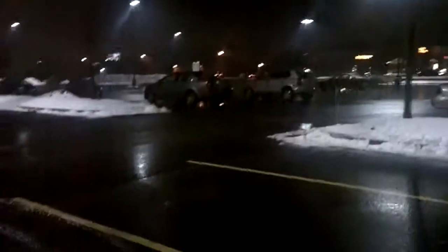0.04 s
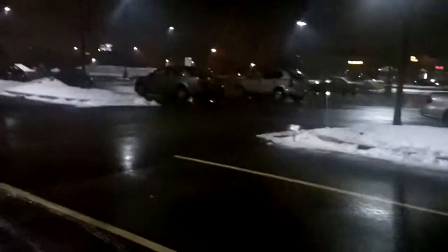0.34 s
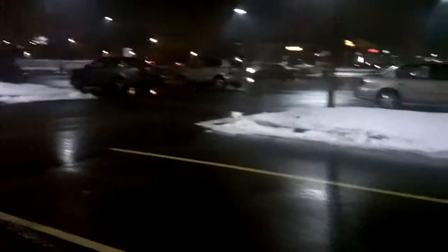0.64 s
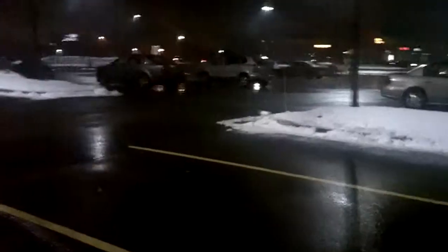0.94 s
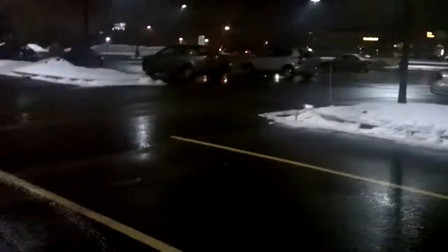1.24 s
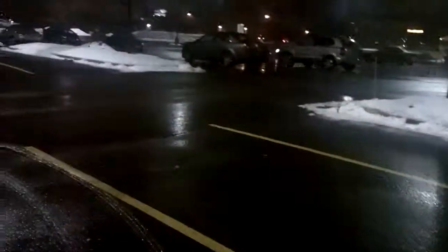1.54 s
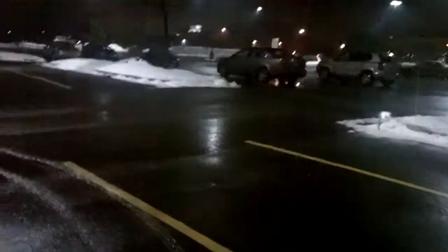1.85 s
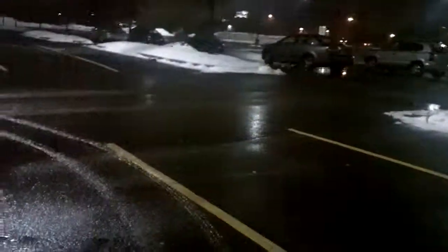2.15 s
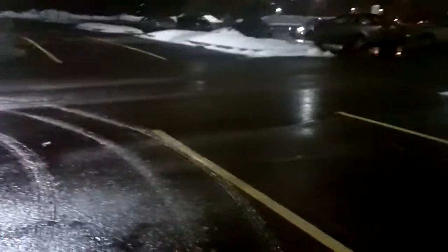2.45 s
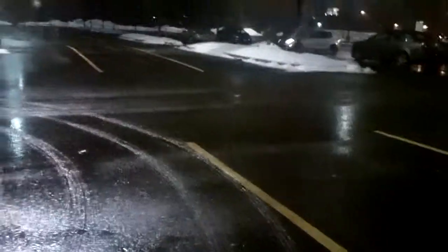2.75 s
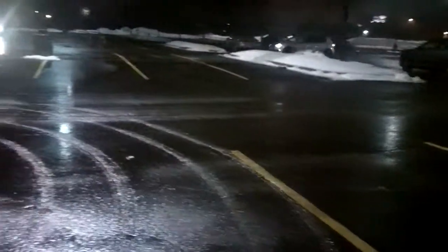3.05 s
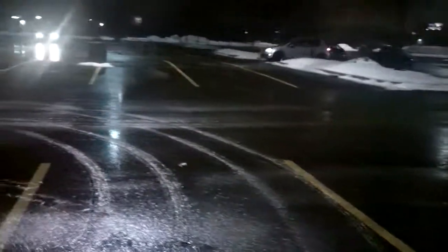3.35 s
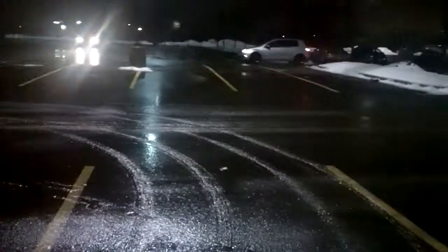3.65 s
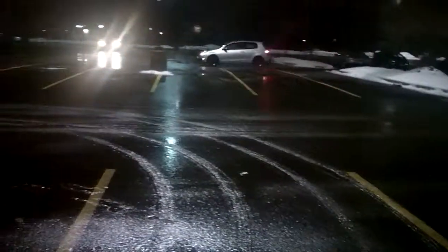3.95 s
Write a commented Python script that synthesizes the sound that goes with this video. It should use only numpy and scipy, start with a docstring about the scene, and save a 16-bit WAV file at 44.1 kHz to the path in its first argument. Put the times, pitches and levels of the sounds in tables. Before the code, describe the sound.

A car engine with a loud exhaust hums low, swells from about 0.6 seconds and barks hardest between 1.4 and 1.9. It lifts off with a breathy rasp near 2 seconds, then drones away, sinking in pitch. Tyres hiss on wet ground throughout, over a quieter slowing engine and distant traffic. A small tick sounds at the start, wind bumps the microphone intermittently, and another car approaches from 3.5 seconds.

```python
"""A wet car park at night. A car revs, barks at full throttle, lifts off and drones away: its periodic firings
radiate a harmonic series, coloured by the tailpipe. A quieter engine sinks in pitch as it slows. Tyres roar and
hiss on the water film, and another car draws near at the end, over distant traffic. Air buffets the microphone,
and narrow notches cut into the treble; two small ticks sound close by."""
import sys
import numpy as np
from scipy import signal
from scipy.fft import rfft, irfft
from scipy.io import wavfile

SR = 44100
rng = np.random.default_rng(int(sys.argv[2]) if len(sys.argv) > 2 else 0)


def generate_wav(signal):
    """Clip the signal to [-1, 1] and save it as 16-bit WAV at the path in sys.argv[1]."""
    frames = np.transpose(np.atleast_2d(signal))
    scaled = np.clip(frames, -1, 1) * 32767
    pcm = np.round(scaled).astype(np.int16)
    wavfile.write(sys.argv[1], SR, pcm)


N = 176400

# loud engine: (time [s], firing rate [Hz])
FIRING_RATE = [(0.0, 111.9), (0.38, 112.3), (0.5, 109.3), (0.73, 114.1), (0.87, 114.2), (1.1, 118.6),
               (1.42, 126.6), (1.5, 126.0), (1.61, 135.2), (1.65, 135.2), (1.72, 138.9), (1.88, 131.6),
               (2.12, 134.5), (2.35, 132.9), (2.55, 131.9), (3.05, 127.5), (3.5, 124.1), (4.0, 117.6)]
# exhaust note: (time [s], fundamental [dB], second harmonic [dB], bark of the upper harmonics [dB])
EXHAUST_LEVELS = [(0, -43, -53, -57), (0.25, -44, -54.5, -69), (0.4, -44.5, -47.5, -58.5),
                  (0.6, -36.5, -43, -63.5), (0.72, -29, -36.5, -46.5), (0.95, -24, -37, -49.5),
                  (1.1, -24, -37, -45), (1.25, -22.5, -39.5, -42.5), (1.42, -24, -35, -35.5),
                  (1.49, -19.5, -28.5, -34), (1.6, -23, -30, -31.5), (1.7, -17.5, -32, -31.5),
                  (1.8, -21, -35.5, -31.5), (1.87, -21.5, -31, -35), (1.97, -22.5, -31.5, -47),
                  (2.15, -30.5, -38.5, -51.5), (2.27, -30, -53, -52), (2.45, -32, -44, -55),
                  (2.65, -29, -38.5, -62), (2.95, -36, -57.5, -57.5), (3.3, -34.5, -46.5, -63.5),
                  (3.58, -34.5, -43, -77), (3.76, -40.5, -50, -49), (3.92, -33.5, -53, -50.5),
                  (4, -36, -47, -52)]
# tailpipe response that colours the bark: (frequency [Hz], gain [dB])
TAILPIPE_RESPONSE = [(300, 3), (342, 4.5), (365, -9), (410, -2), (455, -4.5), (510, 0), (570, -3.5),
                     (590, -10.5), (630, -3), (660, -9.5), (690, -5), (750, -16.5), (850, -18), (1000, -33),
                     (1400, -33)]
# rush of exhaust gas: (frequency [Hz], relative density [dB])
GAS_SPECTRUM = [(40, -2), (80, 2.5), (190, 6), (300, -13), (450, -3.5), (650, -6.5), (850, -21),
                (1200, -16.5), (3000, -34.5)]
# breathy rasp of the pipe as the throttle opens and after it shuts: (time [s], level [dB])
RASP_LEVEL = [(.6, -74), (.72, -47), (.8, -52), (.92, -66), (1.85, -60.5), (2.05, -47), (2.25, -54),
              (2.42, -68), (4, -77)]
# that rasp: (frequency [Hz], relative density [dB])
RASP_SPECTRUM = [(470, -13.5), (575, 3), (690, -4), (780, -17)]
# second engine: (time [s], firing rate [Hz], fundamental [dB], second harmonic [dB])
QUIET_ENGINE = [(0, 87.26, -37.5, -42.5), (.5, 86.4, -41, -51.5), (1, 84.06, -42, -46.5),
                (1.5, 80.56, -35, -51), (2, 78.26, -38.5, -50), (2.5, 76.22, -39, -48.5),
                (3, 71.8, -43, -50), (3.25, 67.46, -42, -56), (3.5, 59.82, -41, -73),
                (3.8, 57.58, -36, -54), (4, 59, -61, -60)]
# tyres on water, before each band's trim: (time [s], roar [dB], hiss [dB], spray [dB])
TYRE_LEVELS = [(0.13, -51.5, -50, -70), (0.36, -59, -52, -74), (0.53, -53, -51, -75),
               (0.74, -51.5, -51.5, -74), (0.92, -49.5, -42.5, -82), (0.99, -47.5, -44.5, -68),
               (1.08, -47.5, -43, -75), (1.14, -47.5, -44.5, -67), (1.22, -46.5, -42.5, -65),
               (1.44, -46, -45.5, -71), (1.78, -44.5, -41, -63), (1.84, -40.5, -41, -67),
               (2.36, -44.5, -43.5, -65.5), (2.66, -43.5, -39, -60.5), (2.8, -45.5, -43.5, -63.5),
               (3.41, -49.5, -48.5, -69), (3.46, -46, -48.5, -62), (3.56, -43.5, -42.5, -63.5),
               (3.63, -41, -39, -55), (3.7, -40, -38.5, -62), (3.77, -41, -36, -54.5),
               (3.84, -40.5, -40, -63.5), (3.97, -42.5, -39, -54.5), (4.0, -43, -36.5, -61)]
# tread roar, water hiss and fine spray: (frequency [Hz], relative density [dB])
ROAR_SPECTRUM = [(500, -11), (800, -2.5), (1050, -6), (1400, 3), (1800, 0.5), (2300, 3), (2700, -9),
                 (3400, -3.5), (5000, -30)]
HISS_SPECTRUM = [(2000, -24.5), (2700, -4), (3300, -1), (4500, 1.5), (4950, 1), (5100, -6), (6200, -12),
                 (7000, -16), (8000, -25), (10000, -33)]
SPRAY_SPECTRUM = [(6000, -14), (8000, -1.5), (9400, 1.5), (10500, -2.5), (11600, -5.5), (12500, -9.5),
                  (13700, -19), (15200, -25)]
# scuffs on wet ground: (time [s], half length [s], centre [Hz], half width [octaves], level [dB])
SWISHES = [(.19, .005, 10500, .25, -64), (0.536, .06, 4570, 0.17, -48.5), (.89, .035, 4000, 0.3, -46),
           (1.223, .025, 4270, 0.21, -45), (2.437, 0.0087, 557, 0.25, -43), (2.442, .008, 14000, .25, -70),
           (3.774, 0.018, 1530, 0.34, -40.5), (3.85, .015, 1100, .6, -41)]
# air on the microphone: (time [s], relative level [dB])
BUFFET_LEVEL = [(0.0, -42), (0.33, -33), (0.43, -54), (0.54, -29), (0.6, -42), (0.69, -43), (0.73, -52),
                (1.05, -52), (1.1, -53), (1.2, -59), (1.34, -35), (1.44, -53), (1.48, -22), (1.63, -52),
                (1.75, -25), (1.89, -49), (1.96, -34), (2.21, -48), (2.24, -25), (2.36, -58), (2.91, -38),
                (2.96, -57), (3.05, -33), (3.22, -62), (3.26, -37), (4.0, -46)]
# its rumble: (frequency [Hz], relative density [dB])
WIND_SPECTRUM = [(12, -14.5), (25, -1), (42, 2), (65, -11.5), (100, -13.5), (200, -28.5), (400, -48.5)]
# close contacts: (time [s], impulse level [dB])
TICKS = [(.0853, -38), (.1026, -21.5)]
# their resonances: (frequency [Hz], gain [dB], time to decay by 60 dB [s])
TICK_MODES = [(1900, -24, 0.0018), (4800, 2.5, 0.0039), (6100, 1, 0.0029), (10000, -22, 0.00092)]
# approaching car: (time [s], level [dB])
APPROACH_LEVEL = [(0, -73.5), (3.2, -51), (3.55, -49.5), (3.7, -44.5), (3.85, -40.5), (4, -40.5)]
# its road noise: (frequency [Hz], relative density [dB])
ROAD_SPECTRUM = [(150, -13), (300, 0), (420, -0.5), (580, 0.5), (800, -7), (1200, -16), (2000, -25)]
# distant traffic and background hiss: (frequency [Hz], relative density [dB])
TRAFFIC_SPECTRUM = [(20, -2.5), (50, 4.5), (100, 0.5), (190, -0.5), (280, -12), (400, -12), (600, -16.5),
                    (1000, -24.5), (2000, -23.5)]
BACKGROUND_SPECTRUM = [(600, -8), (1100, 2.5), (2000, -6.5), (4500, -3.5), (6300, -7.5), (8000, -22.5),
                       (11800, -24.5), (14000, -34), (15200, -31)]
# notches in the treble: (frequency [Hz], bandwidth [Hz])
TREBLE_NOTCHES = [(2713, 527), (5512, 910), (7860, 1650), (10917, 960)]


def loud_exhaust():
    """Periodic firings radiate harmonics; the tailpipe filters the upper ones, and gas leaves in pulses."""
    boom_roughness, bark_roughness, jitter_rad = 0.046, 0.15, 0.027   # unevenness of the firings
    third_db, wander_db, cylinder_db = -15, 1.5, -21
    gas_db, pulsing_depth = -2.5, 0.75
    firing_hz, = in_time(FIRING_RATE)
    boom, drone, bark = from_db(in_time(EXHAUST_LEVELS))
    phase = running_phase(firing_hz) + jitter_rad * drift(25)
    note = boom * (1 + boom_roughness * drift(17)) * np.sin(phase)
    note -= drone * (1 + boom_roughness * drift(25)) * np.cos(2 * phase)
    note -= drone * from_db(third_db) * np.cos(3 * phase)
    pulse = 0
    for k in range(3, 11):
        wander = from_db(wander_db * drift(4.8))
        pulse -= gain_at(TAILPIPE_RESPONSE, k * firing_hz) * np.cos(k * phase) * wander
    # unequal cylinders add lines between the harmonics
    orders = [k / 3 for k in range(2, 18) if k % 3]
    uneven = sum(np.cos(k * phase + rng.uniform(0, 2 * np.pi)) * (1 + .5 * drift(8.1)) for k in orders)
    note += bark * (pulse * (1 + bark_roughness * drift(46)) + from_db(cylinder_db) * uneven)
    rasp, = from_db(in_time(RASP_LEVEL))
    rush = from_db(gas_db) * bark * noise(GAS_SPECTRUM) + rasp * noise(RASP_SPECTRUM)
    return np.sqrt(2) * note + rush * (1 - pulsing_depth * np.cos(phase))


def quiet_engine():
    """Pitch follows firing rate, so this soft, uneven hum sinks as the car slows."""
    roughness, third_db, fall_db = 0.51, -13, 4.5   # third against second harmonic; loss per harmonic
    firing_hz, first_db, second_db = in_time(QUIET_ENGINE)
    phase = running_phase(firing_hz) + 0.15 * drift(4)
    hum = from_db(first_db) * np.sin(phase) + from_db(second_db) * np.sin(2 * phase)
    for k in range(3, 7):
        hum += from_db(second_db + third_db - fall_db * (k - 3)) * np.sin(k * phase + drift(9.6))
    return np.sqrt(2) * hum * (1 + roughness * drift(8.1))


def wet_tyres():
    """Rolling contact radiates broadband noise: the tread roars, the water film hisses and sprays."""
    roar_trim_db, hiss_trim_db, spray_trim_db = -0.53, 1.5, 1
    roar_db, hiss_db, spray_db = in_time(TYRE_LEVELS)
    flicker_db = 0.95 * drift(23)
    roar = from_db(roar_db + roar_trim_db + 0.67 * drift(45)) * noise(ROAR_SPECTRUM)
    hiss = from_db(hiss_db + hiss_trim_db + flicker_db) * noise(HISS_SPECTRUM)
    spray = from_db(spray_db + spray_trim_db + flicker_db) * noise(SPRAY_SPECTRUM)
    return roar + hiss + spray


def swishes():
    """Scuffs on wet ground are band-limited noise under a Gaussian envelope."""
    t, out = np.arange(N) / SR, 0
    octaves = np.log2(np.arange(1, N // 2 + 2) * SR / N)
    for peak_s, half_length_s, hz, half_width, db in SWISHES:
        passband = np.exp(-((octaves - np.log2(hz)) / half_width) ** 2)
        band = irfft(rfft(rng.standard_normal(N)) * passband, N)
        envelope = np.exp(-((t - peak_s) / half_length_s) ** 2 / 2)
        out += from_db(db) * envelope * unit_rms(band)
    return out


def wind(trim_db=-1):
    """Pressure fluctuations of air on the microphone make low lumps of noise."""
    level_db, = in_time(BUFFET_LEVEL)
    return from_db(level_db + trim_db) * noise(WIND_SPECTRUM)


def ticks(rebound_s=.0006, rebound_db=-7):
    """Each tiny hard impact and its one rebound excite damped modes."""
    impulses, out = np.zeros(N), 0
    for time_s, db in TICKS:
        impulses[int(time_s * SR)] += from_db(db)
        impulses[int((time_s + rebound_s) * SR)] += from_db(db + rebound_db)
    for hz, db, t60 in TICK_MODES:
        radius, angle = from_db(-60 / (t60 * SR)), 2 * np.pi * hz / SR
        feedback = [1, -2 * radius * np.cos(angle), radius ** 2]
        out += from_db(db) * signal.lfilter([0, np.sin(angle)], feedback, impulses + 1e-18)
    return out


def approaching_car():
    """Road noise grows in level as its source draws near."""
    level_db, = in_time(APPROACH_LEVEL)
    return from_db(level_db + 0.76 * drift(22)) * noise(ROAD_SPECTRUM)


def low_swell(peak_s=3.26, decay_s=0.16, hz=191, db=-38.5):
    """A low tone, randomly modulated in amplitude and frequency, rises and dies exponentially."""
    envelope = from_db(db) * np.exp(-np.abs(np.arange(N) / SR - peak_s) / decay_s)
    flutter = 1 + 0.36 * drift(20.07)
    return np.sqrt(2) * envelope * flutter * np.sin(running_phase(hz + 9 * drift(25)))


def background(traffic_db=-40.5, hiss_db=-53.5):
    """Stationary noise: the rumble of distant traffic and a faint hiss."""
    return from_db(traffic_db) * noise(TRAFFIC_SPECTRUM) + from_db(hiss_db) * noise(BACKGROUND_SPECTRUM)


def from_db(db):
    """Amplitude grows tenfold for every 20 dB."""
    return 10 ** (np.asarray(db) / 20)


def unit_rms(x):
    """Normalisation to unit mean power."""
    return x / np.sqrt(np.mean(x ** 2) + 1e-20)


def in_time(rows):
    """Linear interpolation of each column over time."""
    times, *columns = np.transpose(rows)
    return [np.interp(np.arange(N) / SR, times, column) for column in columns]


def gain_at(spectrum, hz):
    """Gain of a spectrum, interpolated in decibels over log frequency."""
    points_hz, db = np.transpose(spectrum)
    return from_db(np.interp(np.log(hz + 1e-9), np.log(points_hz), db))


def noise(spectrum):
    """Spectral shaping of white noise, at unit rms, with steep skirts beyond the table's ends."""
    hz = np.arange(N // 2 + 1) * SR / N + 1e-9
    skirts = np.minimum(1, hz / spectrum[0][0]) ** 2 * np.minimum(1, spectrum[-1][0] / hz) ** 4
    return unit_rms(irfft(rfft(rng.standard_normal(N)) * gain_at(spectrum, hz) * skirts, N))


def drift(corner_hz):
    """Low-pass filtered noise wanders smoothly, at unit rms."""
    hz = np.arange(N // 2 + 1) * SR / N
    return unit_rms(irfft(rfft(rng.standard_normal(N)) / (1 + (hz / corner_hz) ** 2), N))


def running_phase(hz):
    """Phase is the time integral of angular frequency."""
    return 2 * np.pi * np.cumsum(hz) / SR


def scene():
    """Superposition: the pressures of all sources add at one microphone."""
    cars = loud_exhaust() + quiet_engine() + wet_tyres() + swishes()
    distant = low_swell() + approaching_car() + background()
    return (cars + distant + wind() + ticks())[None]


def record(dry, cutoff_hz=15300):
    """Narrow notches cut the treble; a steep low-pass cuts the top."""
    for hz, width_hz in TREBLE_NOTCHES:
        dry = signal.lfilter(*signal.iirnotch(hz, hz / width_hz, fs=SR), dry)
    return signal.sosfilt(signal.ellip(12, .1, 90, cutoff_hz, fs=SR, output="sos"), dry)


dry = scene()
out = record(dry)
generate_wav(out)
```